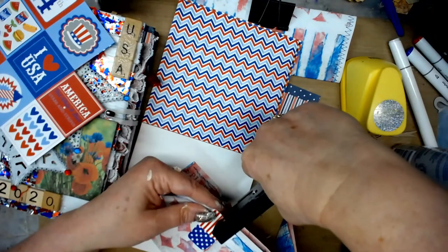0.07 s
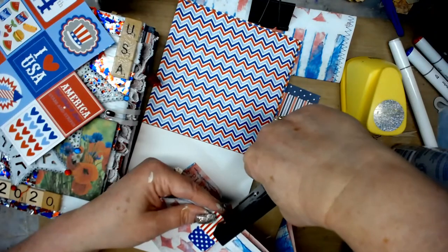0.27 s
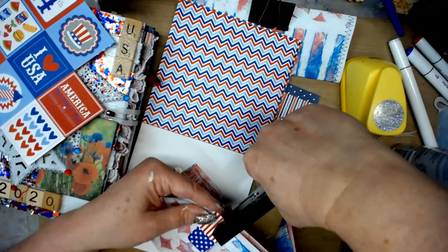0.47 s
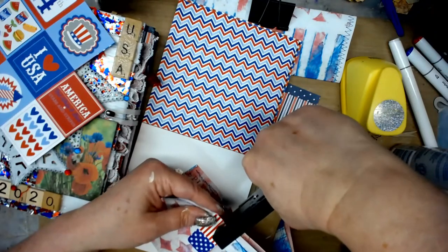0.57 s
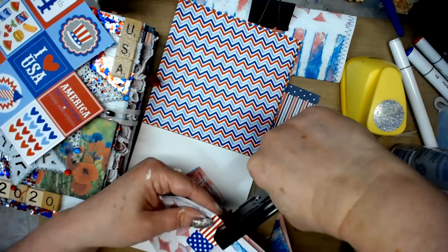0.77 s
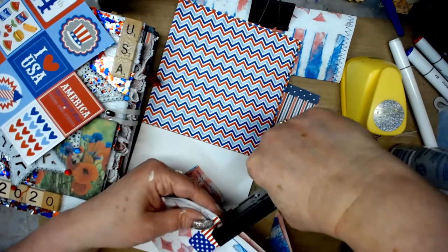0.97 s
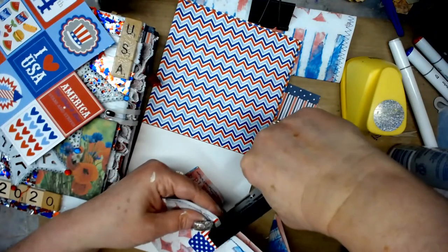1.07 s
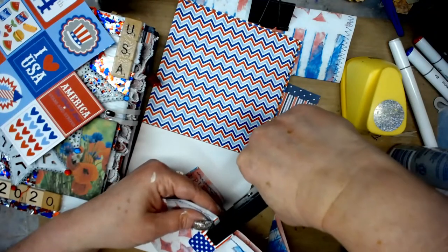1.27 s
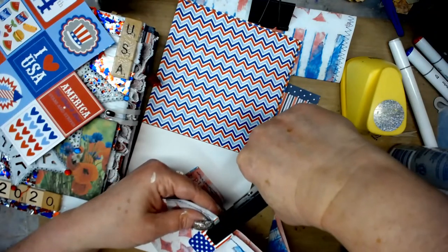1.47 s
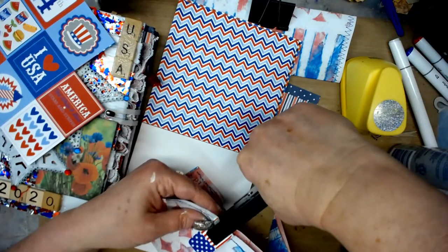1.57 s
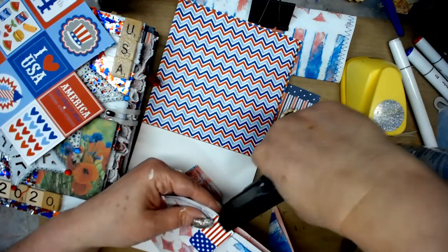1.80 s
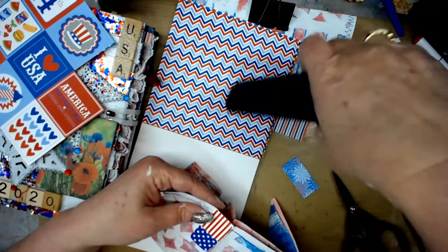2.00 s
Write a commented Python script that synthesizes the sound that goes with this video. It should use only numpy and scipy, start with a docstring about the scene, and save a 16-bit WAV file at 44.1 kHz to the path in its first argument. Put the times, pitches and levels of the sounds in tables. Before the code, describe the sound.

Stapler punches twice at a craft table, crisp metallic clicks and loud spring snaps, close up.

```python
"""Paper rubs faintly over a quiet room's rumble, then a long-reach stapler is pressed twice, close to a stereo pair.
On a craft table each press ticks, punches the staple through folded paper and clinches it; on release the
spring snaps the arm back. Every blow sums decaying modes of steel channel and blade, a gritty noise crack and
a duller noise knock through the table. Noise gives the paper and air; desk and walls answer by convolution."""
import sys
import numpy as np
from scipy import signal
from scipy.fft import rfft, irfft
from scipy.io import wavfile
from scipy.ndimage import uniform_filter1d

SR = 44100
rng = np.random.default_rng(int(sys.argv[2]) if len(sys.argv) > 2 else 0)


def wrap_up_sound(samples):
    """Save the sound to the file named by the first command line argument, as 16-bit audio."""
    columns = np.atleast_2d(samples).T
    # keep every value between -1 and 1, then stretch to whole-number steps
    tamed = np.clip(columns, -1, 1)
    steps = np.round(tamed * 32767).astype(np.int16)
    wavfile.write(sys.argv[1], SR, steps)


N = 90096
T = np.arange(N) / SR  # seconds

# Blows of the press: take-up, punch, clinch. Each row: start, rise, hold and decay in seconds, ring level in dB,
# crack level in dB, crack centre in Hz, crack width in octaves, knock level in dB, left minus right in dB.
PRESS_BLOWS = [ (0.5077, 0.0026, 0.00078, 0.0023, -42, -43, 8200, 0.51, -56.5, -1),
               (0.529, 0.00075, 0.0015, 0.0063, -52.5, -56, 4900, .9, -69, 2),
               (0.5652, 0.000035, 0.0002, 0.00044, -48, -20, 7400, 0.54, -54.5, 0.5),
               (0.5660, .0002, 0.00043, 0.0025, -41.5, -38, 6710, 1.85, -72, 6),
               (0.5934, 0.0012, 0.0009, 0.0014, -29.5, -39.5, 2170, 1.3, -35.5, 1),
               (0.5960, 0.00061, 0.0011, 0.0025, -22, -27, 3400, 1.6, -32.5, 1),
               (0.6379, 0.0016, 0.0023, 0.0015, -35, -40, 2715, 1.01, -51, 1.5),
               (0.6438, 0.00053, 0.004, 0.0023, -27, -26, 2679, 1.1, -40.5, -1.5),
               (1.595, 0.00051, 0.0038, 0.0025, -49.5, -47, 6130, 1.3, -80, 3),
               (1.6462, 0.0048, 0.001, 0.002, -29.5, -34, 4895, 0.82, -55.5, 1.5),
               (1.6830, 0.0029, 0.00095, 0.0028, -32, -36, 3000, 1.1, -57, -3.5),
               (1.6860, 0.00043, 0.0025, 0.0017, -32, -28, 6750, 0.62, -52, 0.5)]
# Clicks of the release, with a faint soft swell just before the second loud snap: spring lets go,
# driver snaps back and rebounds, arm hits its stop. Each row: the same columns and units as the press.
RELEASE_SOUNDS = [ (0.8132, 0.00027, 0.0033, 0.0042, -42, -38, 8220, 1, -67, -1.5),
                  (0.826, .0020, .0020, 0.0034, -47.5, -50, 5985, 0.89, -69, -2),
                  (0.8364, 0.00049, .0008, .0040, -29, -36.5, 5400, 0.52, -60.5, 2),
                  (0.8476, 0.0003, 0.00066, 0.0033, -19, -16, 6074, 0.99, -46.5, -1),
                  (1.797, 0.00016, 0.0014, 0.0053, -41.5, -40, 6230, 1.13, -62.5, -0.5),
                  (1.812, 0.0042, .0020, 0.0018, -44.5, -48, 5680, 0.46, -59.5, 8),
                  (1.821, 0.00058, 0.00086, 0.003, -25, -13.5, 6630, 0.72, -53.5, 0.5),
                  (1.8242, 0.00052, 0.0027, 0.0031, -24.5, -28.5, 5800, 1.23, -43.5, -1),
                  (1.8609, 0.0011, 0.0018, 0.0021, -35.5, -17.5, 5060, 0.62, -37.5, 2)]


def strokes():
    """Pressing and releasing are trains of short sounds of staple, paper and steel, mostly sharp blows."""
    out = np.zeros((2, N))
    for start, *row in PRESS_BLOWS + RELEASE_SOUNDS:
        add(out, start, blow(*row))
    return out


RING_PAN_DB, KNOCK_PAN_DB = -5.5, 0  # left minus right, before the pan of the whole blow
BLADE_DB = -6  # against the crack


def blow(rise, hold, decay, ring_db, crack_db, centre_hz, octaves, knock_db, pan_db, size=4096):
    """Steel meets staple or steel: channel and blade modes, a gritty crack and a knock through the table."""
    t = T[:size]
    contact = envelope(t, rise, hold, decay) * chatter(t)
    ring = channel_ring(t, rise, hold) * pan(RING_PAN_DB)
    blade = blade_ring(t, rise, hold, decay, centre_hz, octaves)
    crack = contact_crack(contact, centre_hz, octaves)
    steel = undb(ring_db) * ring + undb(crack_db) * (crack + undb(BLADE_DB) * blade)
    # steel stays above 1400 Hz, the knock fills in below
    steel = signal.sosfilt(signal.butter(7, 1400, "high", fs=SR, output="sos"), steel)
    knock = undb(knock_db) * table_knock(contact) * pan(KNOCK_PAN_DB)
    return (steel + knock) * pan(pan_db)


# Modes of the steel channel. Each row: frequency in Hz, relative level in dB, decay in seconds.
CHANNEL_MODES = [(1633, -7.5, 0.0045), (1728.4, 3, 0.0024), (1894, 0.5, 0.0041), (2032, -4, 0.0045),
                 (2193, -2.5, 0.0033), (2760, -5.5, 0.0035), (3333, -11.5, 0.0075)]


def channel_ring(t, rise, hold):
    """The channel rings in a handful of modes, each dying at its own rate."""
    ring = 0
    for hz, db, decay in CHANNEL_MODES:
        ring = ring + undb(db) * tone(t, scattered(hz)) * envelope(t, rise, hold, decay)
    return ring / np.linalg.norm(undb([mode[1] for mode in CHANNEL_MODES]))


# Bright modes of the driver blade and magazine. Each row: frequency in Hz, relative level in dB.
BLADE_MODES = [(3350, 0), (3900, -1.5), (4530, -4), (5300, -9.5), (5770, -8.5), (6050, -6), (6400, -7.5),
               (6850, -8.5), (7630, 0.5), (8250, -7.5), (9460, -1), (10100, -6.5), (11600, -8.5)]
BLADE_DECAY_S = 0.003  # longest; a shorter contact shortens it


def blade_ring(t, rise, hold, decay, centre_hz, octaves):
    """Blade and magazine ring brightly, most in the modes near the centre of the crack."""
    weights = undb([db + bump(hz, centre_hz, octaves) for hz, db in BLADE_MODES])
    ring = sum(w * tone(t, scattered(hz)) for w, (hz, _) in zip(weights, BLADE_MODES))
    return ring / np.linalg.norm(weights) * envelope(t, rise, hold, min(BLADE_DECAY_S, decay))


# Colour of the crack. Each row: frequency in Hz, level in dB per Hz.
CRACK_COLOUR = [(300, -33.5), (1200, -16.5), (1600, 1.5), (2200, 5.5), (2550, -7.5), (3300, 2.5),
                (4100, -2.5), (5000, -4), (5900, 0), (7700, -2.5), (9600, -4), (11500, -7.5), (13000, -13),
                (16000, -20)]
CRACK_GRAIN, CRACK_SIDE = 0.092, 0.65  # unevenness of the grains, share of side signal


def contact_crack(contact, centre_hz, octaves):
    """Tiny rough contacts make a gritty noise that lasts as long as the blow."""
    size = contact.size
    hz = bins(size)
    colour_db = on_log(CRACK_COLOUR, hz) + bump(hz, centre_hz, octaves)
    return contact * grainy(noise(colour_db, CRACK_SIDE, size), CRACK_GRAIN)


# Colour of the knock. Each row: frequency in Hz, level in dB per Hz.
KNOCK_COLOUR = [(30, -22.5), (110, -12.5), (200, -8.5), (480, -13.5), (640, 1.5), (780, 5), (1050, 10.5),
                (1350, 0.5), (2000, -25), (5000, -50)]
KNOCK_SIDE = 0.28  # share of side signal, for the thuds too


def table_knock(contact):
    """The table top passes the blow on as a duller noise."""
    return contact * noise(on_log(KNOCK_COLOUR, bins(contact.size)), KNOCK_SIDE, contact.size)


RATTLE_S, RATTLE_DEPTH = 0.0007, 0.47  # step of the micro-impacts, spread of their log strength


def chatter(t):
    """Uneven strength of the micro-impacts that make up a blow."""
    strength = np.exp(RATTLE_DEPTH * np.clip(wander(t, RATTLE_S), -2, 2))
    return strength / np.sqrt(np.mean(strength ** 2))


# Single modes of staple, spring, channel or table top that one blow excites strongly.
# Each row: start in seconds, frequency in Hz, level in dB, decay in seconds.
STRONG_MODES = [(0.510, 1776, -41, 0.0039), (0.508, 6730, -40, 0.003), (0.510, 5560, -39, 0.0013),
                (0.512, 2890, -42, 0.002), (0.5952, 1812, -21, 0.0033), (0.597, 3230, -31, 0.0025),
                (0.597, 7960, -31, .002), (0.645, 8170, -25, 0.0029), (0.645, 2754, -25.5, 0.0044),
                (0.645, 2154, -23, 0.0026), (0.647, 3350, -31.5, 0.0037), (0.648, 4594, -29.5, .0035),
                (0.645, 1202, -34, .004), (0.734, 3286, -55, 0.0047), (0.848, 5964, -15, 0.0029),
                (0.848, 2206, -21.5, .004), (0.849, 3820, -28, .003), (1.597, 6920, -44.5, 0.0066),
                (1.649, 1714, -29.5, 0.0038), (1.652, 8050, -26.5, 0.0022), (1.687, 2850, -25, 0.0027),
                (1.687, 2004, -29.5, 0.0037), (1.688, 7020, -40.5, 0.0053), (1.8205, 5740, -10, 0.0023),
                (1.822, 2198, -19, 0.0047), (1.822, 1637, -33, 0.0062), (1.862, 3147, -31, 0.0079),
                (1.862, 3316, -32, 0.0051), (1.862, 3620, -35.5, 0.01), (1.86, 5735, -25, 0.0021),
                (1.862, 6610, -38.5, 0.011), (1.862, 1188, -36.5, .003), (1.862, 670, -46, 0.0039)]
PING_RISE_S, PING_BUZZ_RAD, PING_BUZZ_S = 0.00038, 0.804, 0.0037  # rise, phase wander, step of the wander


def pings(size=8192):
    """Strong single modes ring out; loose parts make them buzz by a wandering phase."""
    out, t = np.zeros((2, N)), T[:size]
    for start, hz, db, decay in STRONG_MODES:
        buzz = PING_BUZZ_RAD * wander(t, PING_BUZZ_S)
        add(out, start, undb(db) * tone(t, hz, buzz) * envelope(t, PING_RISE_S, 0, decay))
    return out


# The table gives under the punches and clinches.
# Each row: start in seconds, boom level in dB, boom frequency in Hz, boom decay in seconds, thud level in dB.
TABLE_THUMPS = [(0.596, -39, 109.8, 0.0095, -53), (0.644, -55.5, 122, .008, -55),
                (1.649, -46, 109.6, 0.0046, -49), (1.689, -59, 132.9, 0.0037, -53.5)]
THUD_HZ, THUD_OCTAVES, THUD_RISE_S, THUD_DECAY_S = 256, 1, 0.003, 0.015


def thumps(size=8192):
    """The table gives with a short low sine boom and a dull noise thud."""
    out, t = np.zeros((2, N)), T[:size]
    for start, boom_db, hz, decay, thud_db in TABLE_THUMPS:
        boom = np.sin(2 * np.pi * hz * t) * envelope(t, 0, 0, decay)
        thud = noise(bump(bins(size), THUD_HZ, THUD_OCTAVES), KNOCK_SIDE, size)
        thud = thud * envelope(t, THUD_RISE_S, 0, THUD_DECAY_S)
        add(out, start, undb(boom_db) * boom + undb(thud_db) * thud)
    return out


# Paper rubbing and settling. Each row: start, rise and decay in seconds, level in dB, centre in Hz,
# width in octaves.
PAPER_RUBS = [(0.012, 0.035, 0.027, -71, 6000, 0.34), (0.045, 0.028, 0.044, -67, 4700, 3.8),
              (0.119, 0.0022, 0.005, -75, 4800, 0.39), (0.216, 0.0022, 0.0098, -69.5, 6100, 0.41),
              (0.487, 0.019, 0.0027, -67, 5800, 0.37), (0.650, 0.0073, 0.05, -51, 2840, 1.08),
              (0.7345, 0.00026, 0.005, -49.5, 3900, 0.9), (0.739, 0.0077, 0.017, -51, 3760, 0.96),
              (0.892, 0.0013, 0.0039, -50.5, 2210, 1.1), (0.908, 0.002, 0.0055, -55.5, 980, 0.37),
              (0.98, 0.012, 0.036, -70, 3024, 1.1), (1.225, 0.014, .015, -72, 5050, .9),
              (1.375, 0.0023, 0.0041, -65, 4080, 1.05), (2.025, 0.0068, 0.027, -63, 1774, 0.28)]
# Colour of paper. Each row: frequency in Hz, level in dB per Hz.
PAPER_COLOUR = [(500, 8), (8000, -3.5), (10500, -10.5), (15000, -19)]
RUSTLE_GRAIN = 0.45  # unevenness of the grains
SCUFF_S, SCUFF_DB = 0.005, 1.7  # step and spread of the level as the paper catches and slips


def paper(size=16384):
    """The folded sheets rub under the hand and the jaw: grainy noise that catches and slips."""
    out, t, hz = np.zeros((2, N)), T[:size], bins(size)
    for start, rise, decay, db, centre_hz, octaves in PAPER_RUBS:
        rub = grainy(noise(0 * hz, CRACK_SIDE, size), RUSTLE_GRAIN)
        colour = undb(on_log(PAPER_COLOUR, hz) + bump(hz, centre_hz, octaves))
        rub = irfft(rfft(rub) * colour)
        scuffs = undb(SCUFF_DB * wander(t, SCUFF_S))
        add(out, start, undb(db) * rub / rub.std() * scuffs * envelope(t, rise, 0, decay))
    return out


DESK_DB, DESK_DECAY_S, DESK_SIDE = -14, 0.009, 0.35


def desk_scatter(t):
    """The cluttered desk around the stapler scatters sound back quickly."""
    early = envelope(t, 0.0031, 0, DESK_DECAY_S)
    return undb(DESK_DB) * noise(0 * bins(t.size), DESK_SIDE, t.size) * early / np.linalg.norm(early)


# Reflections of the walls. Each row: frequency in Hz, level in dB.
WALL_LEVEL = [(200, -14.5), (1000, -9.5), (2000, -32), (3500, -27.5), (7000, -33), (14000, -26)]
# How long the walls ring. Each row: frequency in Hz, time to fall by 60 dB in seconds.
WALL_T60 = [(200, .32), (2000, .3), (7000, .24), (14000, .19)]
ROOM_DELAY_S, WALL_SIDE = 0.003, 0.85  # silence before the tail (it then fades in over as long), side share


def wall_tail(t):
    """The walls return a short diffuse tail whose decay differs from octave to octave."""
    hz = bins(t.size)
    edges = np.r_[0, 250 * 2 ** np.arange(7), SR]  # band limits in Hz
    white = rfft(noise(0 * hz, WALL_SIDE, t.size))
    coloured = white * undb(on_log(WALL_LEVEL, hz))
    tail = 0
    for lo, hi in zip(edges[:-1], edges[1:]):
        t60 = on_log(WALL_T60, hi / np.sqrt(2))
        fade = undb(-60 * t / t60) * np.clip(t / ROOM_DELAY_S - 1, 0, 1)
        band = irfft(coloured * (hz >= lo) * (hz < hi))
        tail = tail + band * fade / np.linalg.norm(fade)
    return tail


def room(x, size=16384):
    """Desk scatter and wall tail answer every near sound by convolution."""
    t = T[:size]
    return signal.fftconvolve(x, wall_tail(t) + desk_scatter(t), axes=1)[:, :N]


# Colour of the room air. Each row: frequency in Hz, level in dB per Hz.
AIR_COLOUR = [(20, 1.5), (50, -4.5), (75, 0), (120, -1.5), (160, -14), (300, -8), (480, -15.5),
              (650, -11.5), (1050, -14), (1400, -22), (1900, -28), (2800, -29), (4000, -35.5), (6000, -36),
              (10000, -42), (16000, -57.5)]
# Width of the room air. Each row: frequency in Hz, side against middle in dB.
AIR_WIDTH = [(30, -20.5), (125, -16), (300, -8.5), (1000, -8), (3000, 1.5), (12000, 0)]
# Faint steady tones. Each row: frequency in Hz, level in dB.
FAINT_TONES = [(716, -86.5), (8995, -96), (14411, -100)]
AIR_DB = -63.5


def air():
    """Steady rumble and hiss of the room, as coloured noise, with a few faint tones."""
    hz = bins(N)
    hiss = undb(AIR_DB) * noise(on_log(AIR_COLOUR, hz), undb(on_log(AIR_WIDTH, hz)), N)
    return hiss + sum(undb(db) * tone(T, f) for f, db in FAINT_TONES)


RING_SPREAD_RAD, RING_SPREAD_HZ = 0.54, 3500  # phase offset of each side, and the frequency it holds at


def tone(t, hz, buzz=0):
    """One mode, rms 1, out of step at the two microphones, more so the higher it is, up to a limit."""
    spread = min(RING_SPREAD_RAD * np.sqrt(hz / RING_SPREAD_HZ), np.pi / 5)
    phase = 2 * np.pi * rng.random() + spread * rng.choice([-1, 1]) * np.array([[1], [-1]])
    return np.sqrt(2) * np.sin(2 * np.pi * hz * t + phase + buzz)


MODE_SCATTER = 0.006  # spread as a share of the frequency


def scattered(hz):
    """A mode lands at a slightly different pitch in each blow."""
    return hz * (1 + MODE_SCATTER * rng.standard_normal())


def noise(db, side, size):
    """Stereo noise of rms 1 with the given spectrum and share of side signal."""
    mid, wide = np.exp(2j * np.pi * rng.random((2, len(db)))) * undb(db)
    x = irfft(np.array([mid + side * wide, mid - side * wide]), size)
    return x / x.std()


def grainy(x, grain):
    """Break a noise into tiny contacts of uneven strength, 8 samples each and smoothed."""
    size = x.shape[1]
    strength = np.repeat(np.exp(grain * rng.standard_normal(size)), 8)[:size]
    strength = uniform_filter1d(strength, 8)
    return x * strength / np.sqrt(np.mean(strength ** 2))


def envelope(t, rise, hold, decay):
    """Straight rise, hold, exponential decay, in seconds."""
    fall = np.exp(-np.maximum(t - rise - hold, 0) / max(decay, 1 / SR))
    return np.clip(t / max(rise, 1 / SR), 0, 1) * fall


def wander(t, step_s, count=1024):
    """Random values a step apart, joined by straight lines."""
    return np.interp(t / max(step_s, 1 / SR), np.arange(count), rng.standard_normal(count))


def bump(hz, centre_hz, octaves):
    """A broad spectral hill in dB, its power down to 1/e one width from the centre."""
    return -10 * np.log10(np.e) * (np.log2(hz / centre_hz) / octaves) ** 2


def pan(db):
    """Left and right gains for a level difference in dB."""
    return undb(np.array([[db], [-db]]) / 2)


def undb(db):
    """Decibels to gain."""
    return 10 ** (np.asarray(db) / 20)


def on_log(points, hz):
    """Read a table of (Hz, value) on a log-frequency axis."""
    p = np.array(points, float)
    return np.interp(np.log(hz), np.log(p[:, 0]), p[:, 1])


def bins(size):
    """Frequencies of a spectrum in Hz, kept above zero for the logarithms."""
    return np.maximum(np.fft.rfftfreq(size, 1 / SR), 1)


def add(out, start, x):
    """Mix a sound in at its time."""
    i = int(start * SR)
    out[:, i:i + x.shape[1]] += x[:, :N - i]


def scene():
    """Stapler and paper close by, their reflections, and the air of the room."""
    near = strokes() + pings() + thumps() + paper()
    return near + room(near) + air()


OVERLOAD, TOP_HZ = 1.5, 16000  # ceiling of the rounding (full scale is 1), top of the passband


def record(dry):
    """The recorder rounds the loudest snaps and cuts the top."""
    rounded = OVERLOAD * np.tanh(dry / OVERLOAD)
    return signal.sosfilt(signal.ellip(8, 0.2, 70, TOP_HZ, fs=SR, output="sos"), rounded)


dry = scene()
out = record(dry)
wrap_up_sound(out)
```